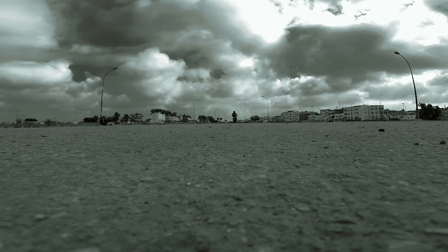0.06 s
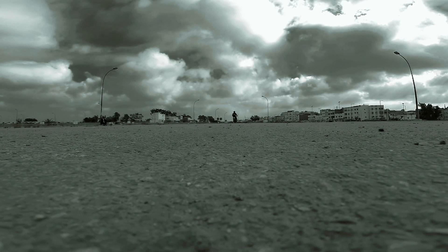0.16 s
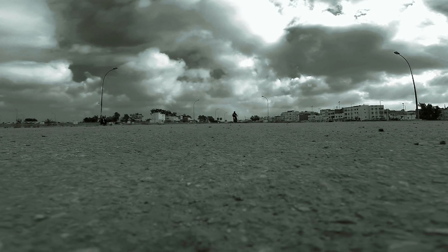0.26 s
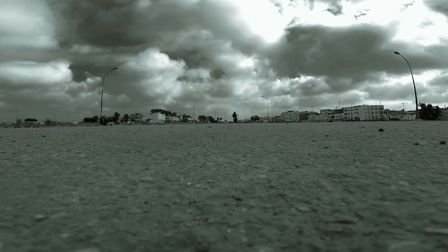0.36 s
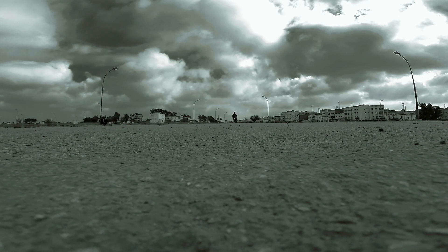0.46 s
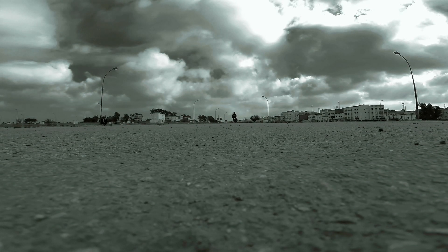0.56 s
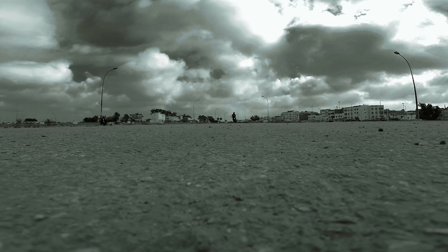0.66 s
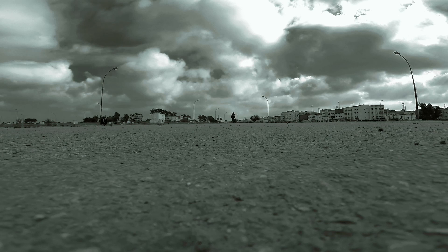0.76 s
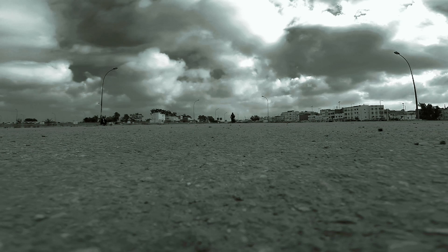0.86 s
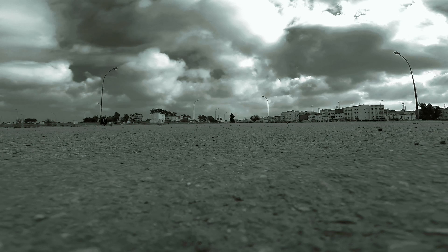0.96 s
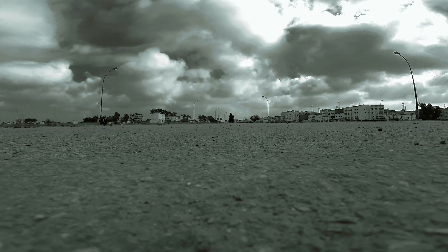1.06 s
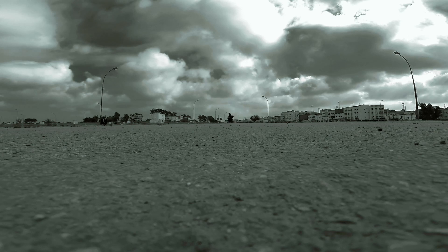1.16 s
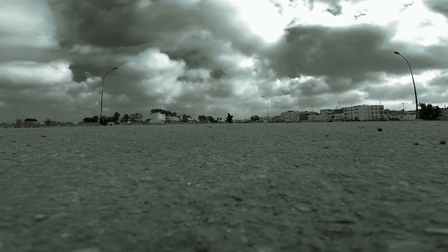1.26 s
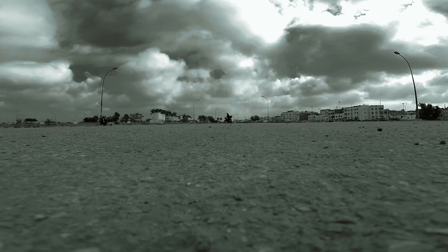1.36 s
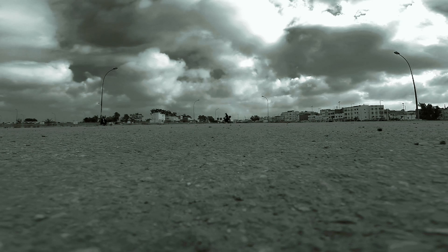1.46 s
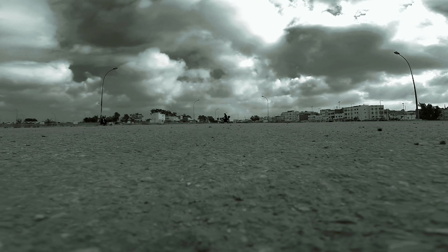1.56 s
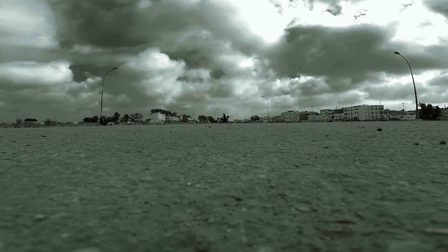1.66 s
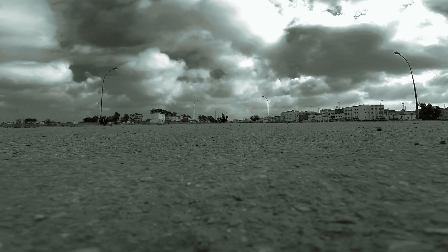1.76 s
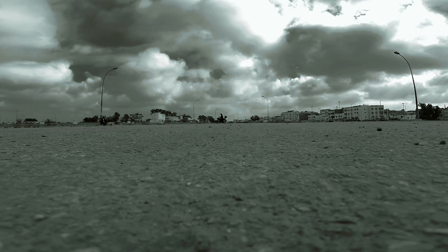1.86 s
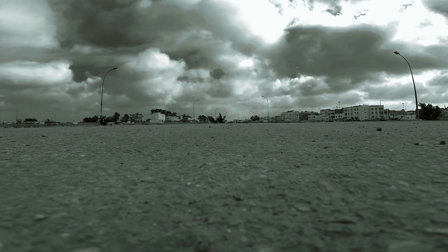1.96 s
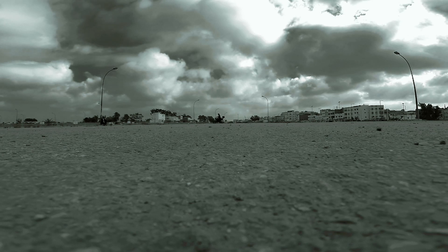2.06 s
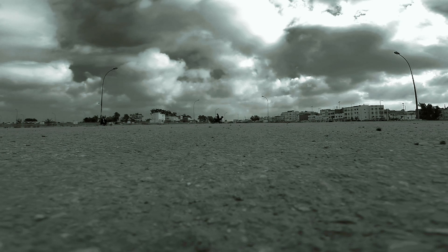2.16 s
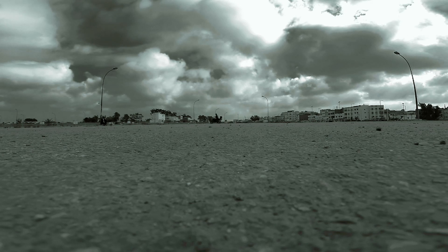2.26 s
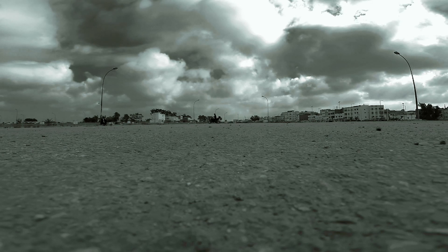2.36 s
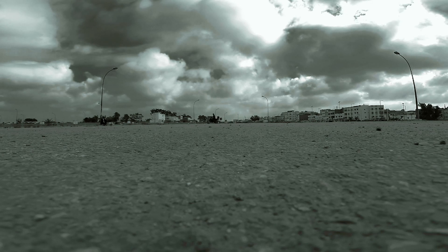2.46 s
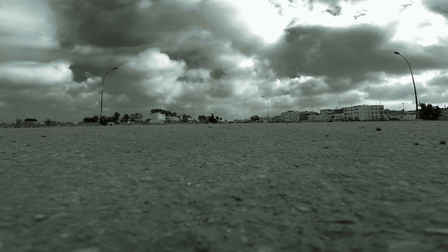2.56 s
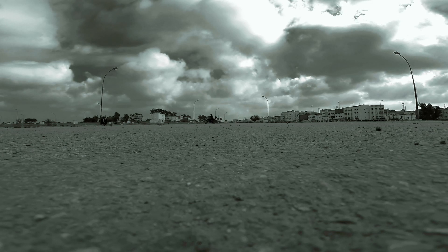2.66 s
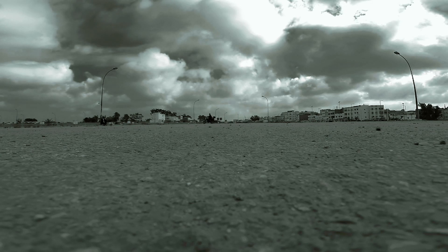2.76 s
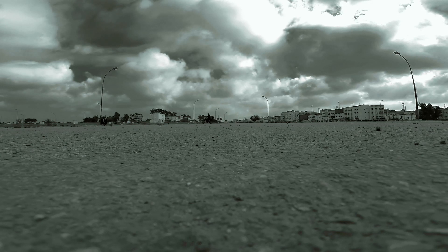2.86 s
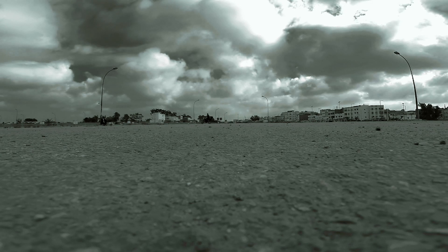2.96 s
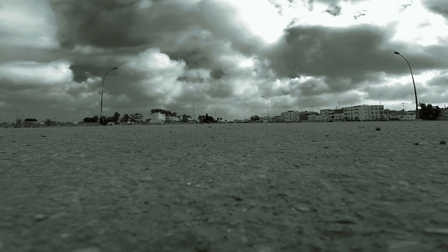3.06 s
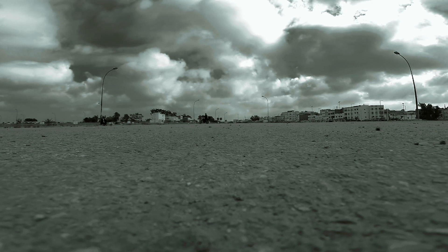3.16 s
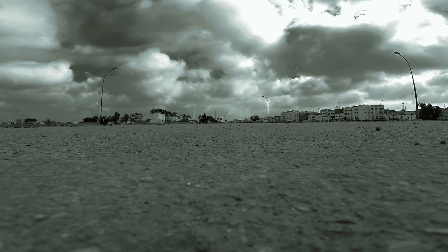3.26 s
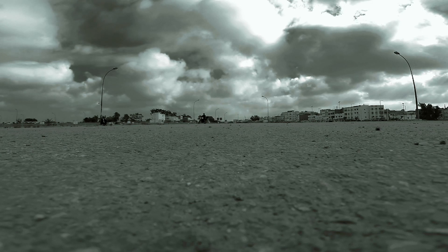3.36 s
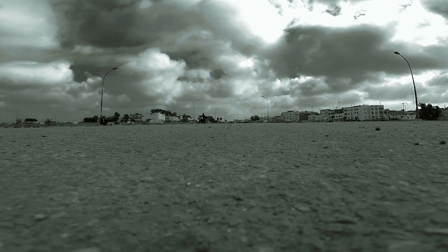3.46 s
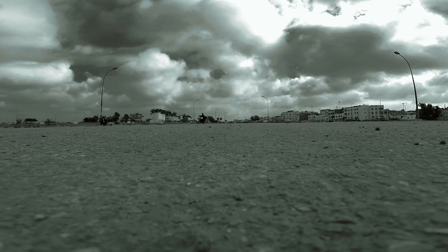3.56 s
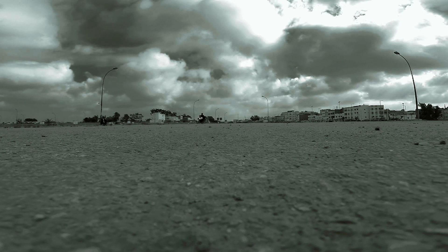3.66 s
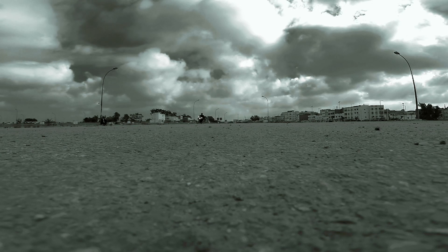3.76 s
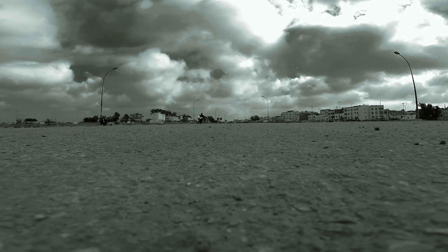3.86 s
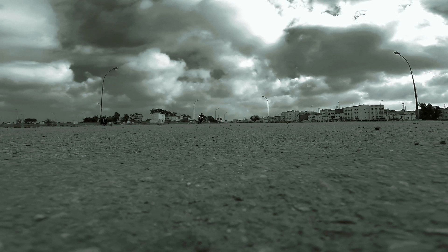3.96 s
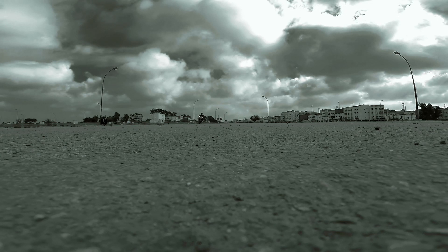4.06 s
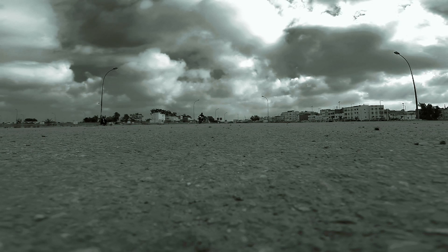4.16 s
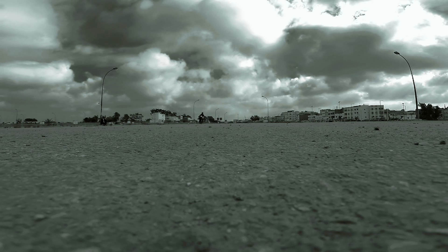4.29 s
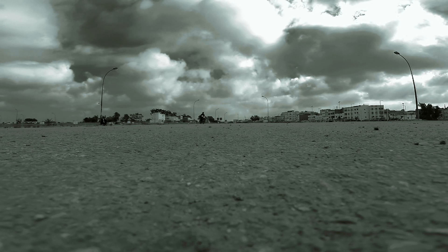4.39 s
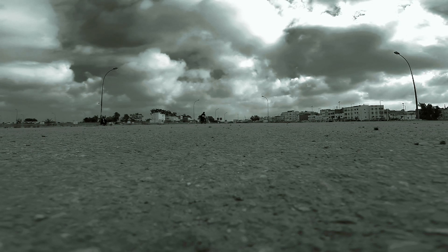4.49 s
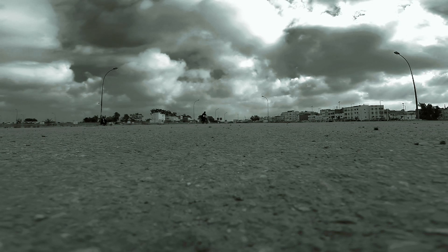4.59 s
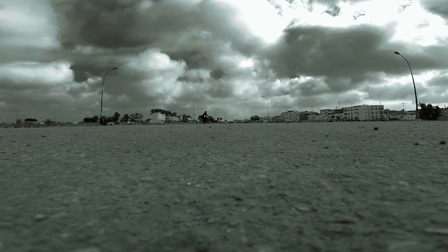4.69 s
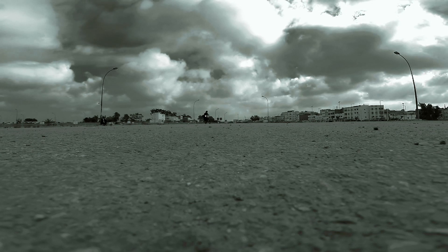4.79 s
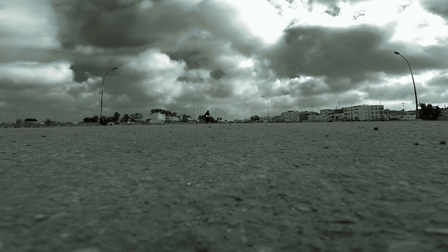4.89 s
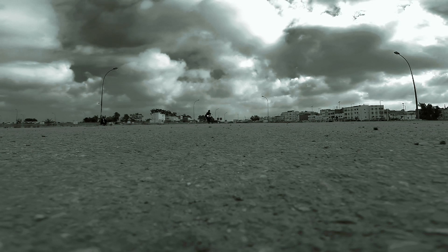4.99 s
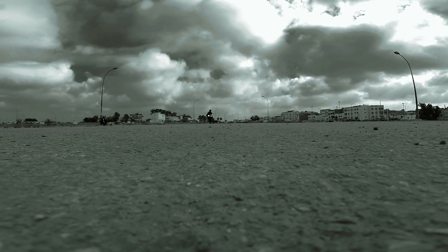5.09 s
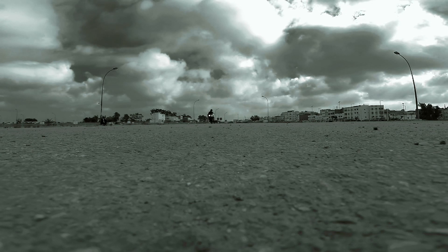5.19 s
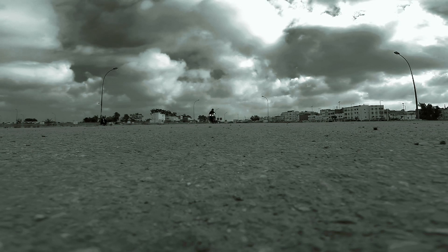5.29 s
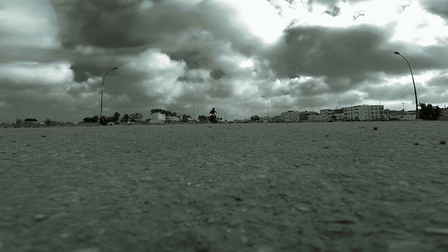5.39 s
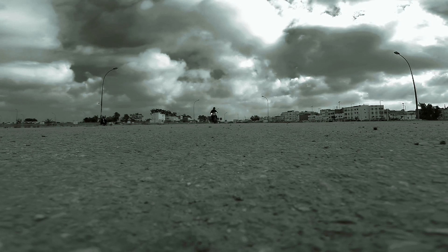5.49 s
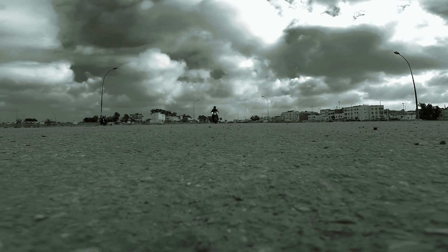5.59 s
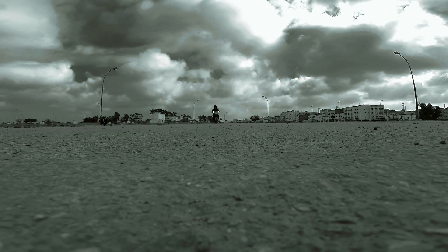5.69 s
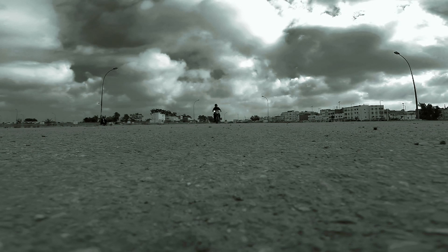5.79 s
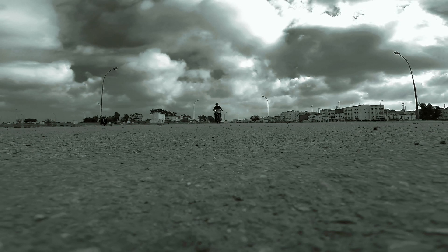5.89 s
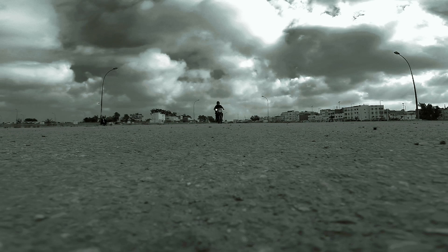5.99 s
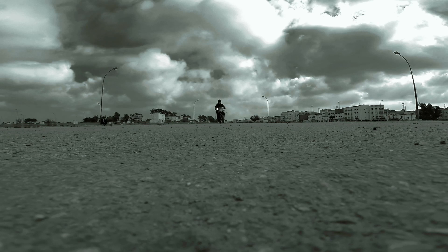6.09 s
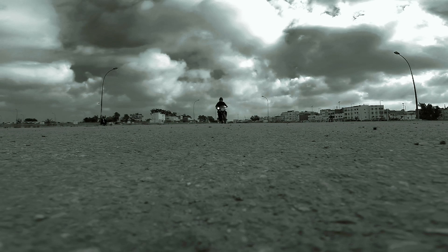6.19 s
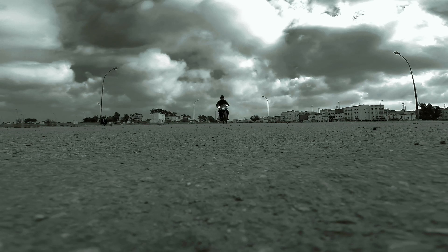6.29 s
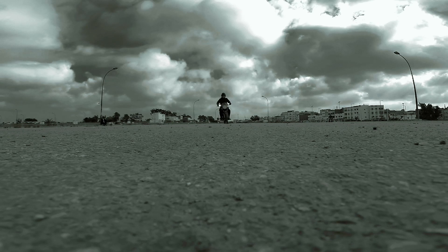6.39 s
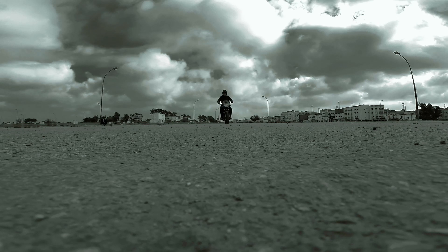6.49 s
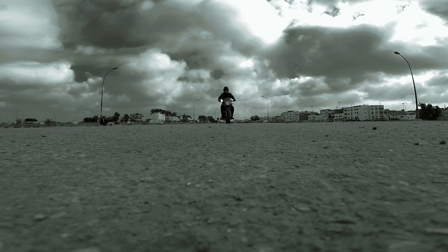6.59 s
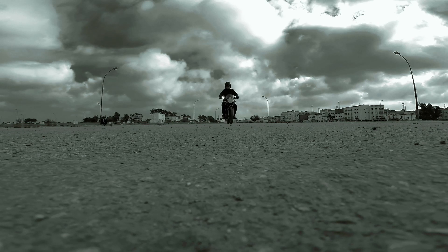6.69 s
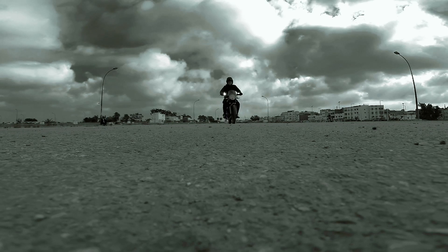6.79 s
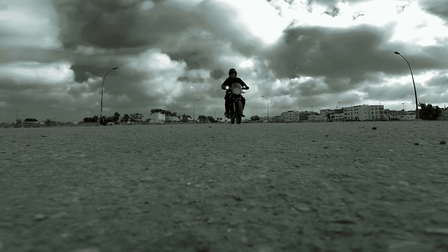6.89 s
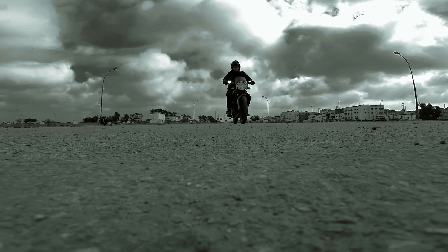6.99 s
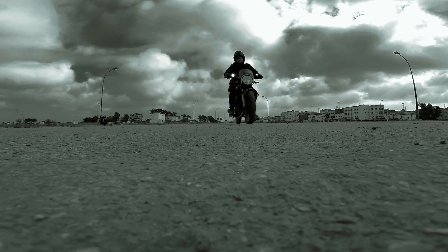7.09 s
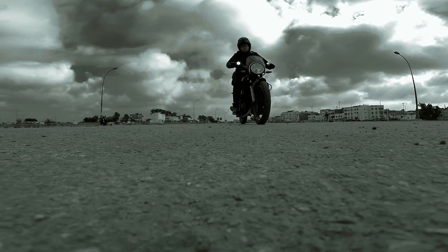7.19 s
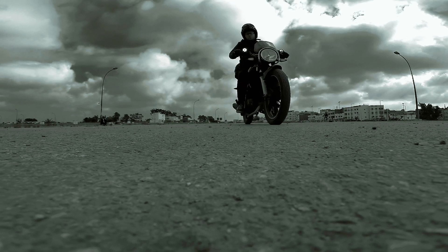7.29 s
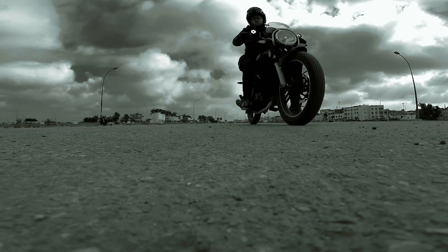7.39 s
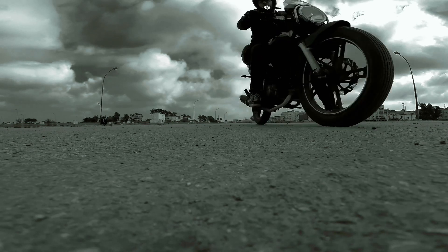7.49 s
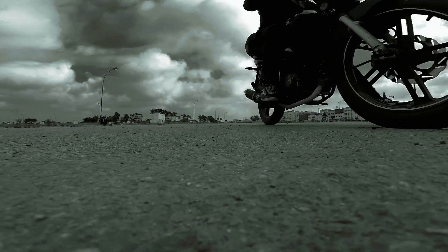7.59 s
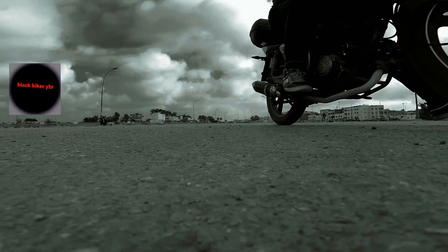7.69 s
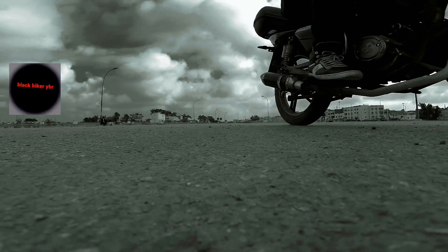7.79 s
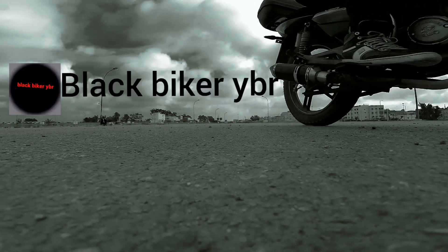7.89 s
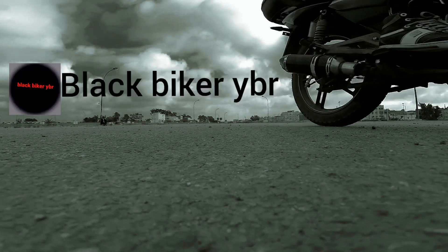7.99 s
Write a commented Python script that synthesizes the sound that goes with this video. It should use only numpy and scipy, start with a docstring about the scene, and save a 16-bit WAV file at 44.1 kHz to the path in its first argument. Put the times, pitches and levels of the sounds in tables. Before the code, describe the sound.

A motorcycle idles far off, revs in short blips, accelerates closer and brakes with a gritty tyre skid.

```python
"""A distant single-cylinder motorcycle idles unevenly on an open paved lot, over town hum and light wind.
It blips the throttle, accelerates towards a microphone on the ground, shuts off and brakes to a stop.
Each firing is a puff that rings the silencer and pipe; valves, chain and intake clatter, gears whine.
The pads make the disc squeak; slipping tyres howl, grind grit and knock stones."""
import sys
import numpy as np
from scipy import signal
from scipy.fft import rfft, irfft, next_fast_len
from scipy.io import wavfile
from scipy.ndimage import uniform_filter1d, map_coordinates

SR = 44100
rng = np.random.default_rng(int(sys.argv[2]) if len(sys.argv) > 2 else 0)


def store_wav(level_fs):
    """Save 16-bit WAV to argv[1]."""
    pcm = np.round(np.clip(np.atleast_2d(level_fs), -1, 1) * 32767)
    wavfile.write(sys.argv[1], SR, pcm.T.astype(np.int16))


N = 354984

# base firing interval: time_s, gap_ms
FIRING_GAP = [(0.01, 63.49), (1.4, 69.85), (1.466, 43.12), (3.39, 34.48), (3.46, 30.62), (3.9, 29.72),
              (4.37, 27.57), (5.1, 23.74), (5.39, 21.36), (5.7, 19.47), (6.137, 17.1), (6.175, 19.34),
              (6.6, 25.84), (6.9, 37.57), (7.29, 57.91), (7.5, 72.59), (8.05, 75.65)]


def amp(db):
    return 10 ** (np.asarray(db) / 20)


def unit(x):
    return x / np.sqrt(np.mean(x ** 2) + 1e-20)


def curves(rows, at=None):
    """Columns interpolated over the first, at every sample or at given points."""
    knots, *cols = np.transpose(rows)
    return [np.interp(np.arange(N) / SR if at is None else at, knots, c) for c in cols]


def wobble(rate_hz):
    """Smooth random curve, rate_hz knots a second."""
    knots = rng.standard_normal(int(N * rate_hz / SR) + 4)
    return map_coordinates(knots, [np.arange(N) * rate_hz / SR])


def filtered(x, response):
    """Apply a gain given as a function of Hz."""
    size = next_fast_len(N + SR // 2)
    return irfft(rfft(x, size) * response(np.fft.rfftfreq(size, 1 / SR)), size)[..., :N]


def rush(spectrum, patchy_db):
    """Coloured noise, rms 1, with time-frequency patches of random gain."""
    bins = signal.stft(rng.standard_normal(N + 512), nperseg=512)[2]
    patches = uniform_filter1d(rng.standard_normal(bins.shape), size=5, axis=0)
    patches = uniform_filter1d(patches, size=6, axis=1)
    noise = signal.istft(bins * amp(patchy_db * unit(patches)), nperseg=512)[1][:N]
    hz, db = np.transpose(spectrum)
    return unit(filtered(noise, lambda f: amp(np.interp(np.log(f + 1), np.log(hz), db, -120, -120))))


def place(times_s, rows, lead=0):
    """Sum one row at each time, starting lead samples early."""
    at = np.round(times_s * SR).astype(int)[:, None] + np.arange(rows.shape[1])
    return np.bincount(at.ravel(), rows.ravel(), N + SR)[lead:lead + N]


def firings():
    """Puff times in s: one base interval apart, with small jumps in the rhythm."""
    # next puff heard late (+) or early (-): time_s, shift_ms
    timing_skips = [(0.016, -23.9), (0.311, 20.7), (0.398, -11.8), (0.451, -9.7), (0.507, 11.9),
                    (0.584, -16.5), (0.634, 8.9), (0.844, 11.5), (1.558, 6.1), (1.607, -13.6),
                    (1.721, 19.7), (1.823, 11.8), (1.959, -10.4), (1.99, -6.8), (2.064, -3), (2.102, -5.5),
                    (2.136, -5.4), (2.17, 5.4), (2.256, 13.7), (2.349, 18.3), (2.446, 38.4), (2.637, -10.8),
                    (2.737, 18), (2.793, -18), (2.815, 10.9), (2.862, 7.6), (2.907, -6.4), (2.935, 5.2),
                    (2.977, -5.4), (3.007, 4.5), (3.049, -1.6), (3.085, 22.1), (3.179, 28.2), (3.242, 13.8),
                    (3.325, -1.8), (3.359, 5), (3.399, -7.1), (3.427, 4.5), (3.493, -4.9), (3.519, 3.6),
                    (3.554, 5.3), (3.619, 2.8), (3.653, -6.7), (3.977, -11.0), (4.024, 5.0), (4.117, -11.3),
                    (4.305, -11.4), (4.537, -6.6), (4.585, -6.3), (4.631, -6.3), (4.677, -6.7),
                    (4.748, -6.1), (4.819, -9.6), (4.909, -5.0), (5.003, -5.5), (5.07, 9.4), (6.385, 6.8),
                    (6.51, -2.8), (6.582, -3.7), (6.652, -9.4), (6.763, -4.8), (6.789, -6.0), (6.816, 10.5),
                    (6.86, -11.3), (6.92, -5.5), (6.953, 13.2), (7.006, -7.8), (7.086, 13.4),
                    (7.148, -12.5), (7.351, -19.9), (7.454, -13.2)]
    skip_s, shift_ms = np.transpose(timing_skips)
    fire_s = [FIRING_GAP[0][0]]
    while fire_s[-1] < N / SR:
        now = fire_s[-1]
        late_ms = shift_ms[(skip_s > now) & (skip_s <= now + .012)].sum()
        fire_s.append(now + (curves(FIRING_GAP, now)[0] + late_ms) / 1000)
    return np.array(fire_s)


def throttle(fire_s):
    """Per firing: blips lift level and pitch; snapping shut boosts the second chamber."""
    # throttle openings: start_s, held_s, boost_db, chamber_snap_db
    openings = [(1.455, .07, 12, 5), (1.9, .1, 13, 10), (2.84, .075, 13, 9.5), (3.34, .09, 12, 11),
                (3.66, .085, 8, 11.5), (3.87, 2.285, 0, 8)]
    # single weak or strong firings: time_s, gain_db
    uneven = [(.11, 3), (.245, -4.5), (.305, 3), (.392, -2.5), (1.4, 3), (1.601, -6.5), (1.912, -2.5),
              (2.131, 3.5), (2.211, -0.5), (2.25, 4), (2.788, 1), (2.809, 11), (3.043, 4.5), (3.173, 5.5),
              (3.236, -0.5), (3.285, -11), (3.32, 8), (3.457, -4.5), (3.651, -8), (3.791, -4.5),
              (3.85, -11.5), (4.126, -2.5), (4.311, -3), (6.524, -2), (6.854, -10.5), (7.001, -2.5),
              (7.037, 5)]
    settle_s, sink_s, shut_fade_s = .18, .08, .6
    start_s, held_s, boost_db, chamber_snap_db = np.transpose(openings)
    after_s = fire_s[:, None] - start_s - held_s
    opened = (after_s > -held_s) & (after_s < 0)
    tail = lambda decay_s: (after_s > 0) * np.exp(-np.abs(after_s) / decay_s)
    uneven_db = sum(db * (np.abs(fire_s - s) < .008) for s, db in uneven)
    extra_db = (opened + tail(settle_s)) @ boost_db + uneven_db
    weak_db = 1.2 * np.minimum(uneven_db, 0)  # weak firings lose front and pipe ring
    blipped = opened @ boost_db > 0
    climb = opened * (1 + after_s / held_s) + tail(sink_s)
    pitch_ratio = 1 + .014 * (climb @ boost_db)
    snap_db = np.exp(-((after_s - .03) / .026) ** 2) @ chamber_snap_db
    shut = tail(shut_fade_s).max(axis=1) * ~opened.any(axis=1)  # 1 on closing, then fades
    return np.array([extra_db, weak_db, blipped, pitch_ratio, snap_db, shut])[..., None]


def silencer(t, hz, steepness, front_db, chamber_db, t60_s, hold):
    """Thud: a steepened suction front, then the main note and a second chamber ring out."""
    chamber_hz = 179
    cycles = hz * t * np.where(t < 0, steepness, 1)
    rise = np.sin(np.pi * np.clip(2 * cycles + 1.5, 0, .5)) ** 2
    front = amp(front_db * np.clip(-2 * cycles, 0, 1))
    fade = amp(-60 * (np.maximum(t, 0) / t60_s) ** hold)
    chamber = amp(chamber_db) * np.cos(2 * np.pi * chamber_hz * t)
    return rise * front * fade * (np.cos(2 * np.pi * cycles) + chamber)


def pipe(t, stage, tuning, shut, scatter):
    """Pipe modes jump in pitch on shut-off; the upper three swell slower, ring louder and longer."""
    # pipe resonances: base_hz, level_db, base_t60_s, full_load_gain_db
    modes = [(334, 24, 0.0097, -5.5), (463.7, -6, 0.077, -8), (616, -10.5, 0.063, 9.5),
             (856, -3.5, 0.027, 6)]
    load = np.clip(stage / 3 - 1, 0, 1)
    pitch_ratio = tuning + .21 * shut
    ring = 0
    for k, (base_hz, level_db, base_t60_s, load_db) in enumerate(modes):
        ringing = (k > 0) * shut ** .35
        mode_db = level_db + load_db * load + 12 * ringing + (1.5 + k / 2) * scatter[k]
        t60_s = base_t60_s * (1 + .8 * ringing)
        attack = 1 - np.exp(-t / (.00006 + .005 * ringing))
        ring += attack * amp(mode_db - 60 * t / t60_s) * np.sin(2 * np.pi * base_hz * pitch_ratio * t)
    return ring


def pipe_mouth(hz):
    """Response: the small mouth radiates little deep bass, and the pipe holds back one band."""
    notch_hz, width_hz, depth = 773, 167, .51
    low_cut = 1 / (1 + (55 / (hz + 1)) ** 4)
    damping = 1j * hz * width_hz
    return low_cut * (1 - depth * damping / (notch_hz ** 2 - hz ** 2 + damping))


def exhaust(fire_s):
    """One puff of silencer thud and pipe ring per firing; louder when near, brighter under load."""
    # approach: time_s, base_level_db, stage
    ride = [(0, -27.5, 0.66), (1.35, -27.5, -0.5), (1.45, -30.5, 1.5), (1.85, -29.5, 2), (2.75, -31, 1),
            (3.3, -32, 1.5), (3.5, -26, 1.9), (3.62, -25, 2.5), (3.85, -25, 4), (3.9, -18.5, 3.5),
            (4.3, -15.5, 6), (5, -12.5, 5.5), (5.5, -13, 7), (6.1, -10.5, 7.5), (6.158, -14.5, 5),
            (6.17, -10.5, 4.5), (6.3, -12, 4), (6.5, -11, 3), (6.8, -11, 2.12), (6.96, -10, 1.5),
            (7.08, -21, 2.5), (7.25, -19.5, 3.5), (7.5, -14, 0), (8.05, -13.5, 0.43)]
    # stages: 0 idle, 1 coast, 2 engine braking, 3 just shut at speed, 4 pull away, 5 hard pull, 6 full
    # base puff shape: stage, silencer_hz, t60_s, hold_exponent, steepness, front_db, chamber_db,
    # cutoff_hz, pipe_db
    puff_shapes = [(0, 125, 0.048, 3.7, 1.1, -17, -10.5, 447, -26),
                   (1, 115.7, 0.042, 1.8, 1.25, -3, -11.5, 450, -24.5),
                   (2, 118.4, 0.05, 1.18, 1.196, 0, -19.5, 610, -19.5),
                   (3, 146, 0.061, 1.4, 1.7, 1.5, -2.5, 645, -9.5),
                   (4, 140.6, 0.08, 1.74, 1.9, 3.5, -4.5, 865, -14),
                   (5, 125.6, 0.062, 1.02, 2.46, -3.5, 11, 1220, -15.5),
                   (6, 120.6, 0.025, 1.84, 2.16, 5, -8, 1480, -8)]
    # puff shape in a blip: same columns without stage
    blip_shape = (126, .03, 3.2, 2.1, -1.5, -10, 580, -14.5)
    # modes rise under load, top opens on approach: time_s, pitch_ratio, cutoff_ratio
    pipe_tuning = [(0, .86, 1), (3.9, .85, .78), (4.3, .88, .68), (4.8, .92, .84), (5.7, 0.99, 1),
                   (6.15, 1.03, 1), (6.17, .9, 1), (6.6, .89, .9), (7, .86, .8), (8.05, .84, 1)]
    # brief stutters in the sound, a puff heard twice in quick succession: time_s, gain_db
    stutters = [(6.4013, -4.5), (6.845, -5.5), (7.089, -6), (7.129, -3)]
    stutter_s, stutter_db = np.transpose(stutters)
    fire_s = np.append(fire_s, stutter_s)
    lead = SR // 100
    t = (np.arange(SR // 10) - lead) / SR
    level_db, stage = curves(ride, fire_s[:, None])
    tuning, cutoff_ratio = curves(pipe_tuning, fire_s[:, None])
    extra_db, weak_db, blipped, pitch_ratio, snap_db, shut = throttle(fire_s)
    extra_db[-len(stutters):, 0] += stutter_db
    shape = [np.where(blipped, blip, usual) for usual, blip in zip(curves(puff_shapes, stage), blip_shape)]
    base_hz, t60_s, hold, steepness, front_db, chamber_db, cutoff_hz, pipe_db = shape
    scatter = rng.standard_normal((len(fire_s), 8)).T[..., None]
    pitch_scatter, level_scatter, chamber_scatter, *mode_scatter, cutoff_scatter = scatter

    hz = base_hz * pitch_ratio * (1 + .008 * pitch_scatter)
    chamber_db = chamber_db + snap_db + .5 * chamber_scatter
    thud = silencer(t, hz, steepness, front_db + weak_db, chamber_db, t60_s, hold)
    since_front_s = np.maximum(t + .5 / (hz * steepness), 0)
    ring = pipe(since_front_s, stage, tuning, shut, mode_scatter)

    gap_samples = curves(FIRING_GAP, fire_s[:, None])[0] * SR / 1000
    fill_gap = lambda rows: rows * np.sqrt(gap_samples / np.sum(rows ** 2, axis=1, keepdims=True))
    puffs = fill_gap(thud) + amp(pipe_db + weak_db) * fill_gap(ring)
    puffs *= amp(level_db + extra_db + .5 * level_scatter)
    cutoff_hz = cutoff_hz * cutoff_ratio * np.exp(.1 * cutoff_scatter)
    lowpass = 1 / (1 + (np.fft.rfftfreq(len(t), 1 / SR) / cutoff_hz) ** 4)
    puffs = irfft(rfft(puffs) * lowpass, len(t))
    return filtered(place(fire_s, puffs, lead), pipe_mouth)


def lot_echo(x, t60_s=.35):
    """Scattered echoes from kerbs and far buildings."""
    t = np.arange(SR // 3) / SR
    tail = rng.standard_normal(len(t)) * amp(-60 * t / t60_s) * (t > .012)
    return signal.fftconvolve(x, tail / np.linalg.norm(tail))[:N]


def town():
    """Even town noise with narrow bands that waver independently."""
    # background levels: time_s, noise_db, hum_db
    levels = [(0, -43.5, -59.5), (3.25, -43, -60), (3.4, -43, -68), (4.3, -40, -79.5), (6.5, -36.5, -77),
              (8.05, -36, -78)]
    # broad noise: freq_hz, density_db
    spectrum = [(130, -3.5), (250, 0.5), (500, -9), (1000, -13), (2000, -21.5), (3200, -24.5),
                (5000, -35.5), (8000, -44), (14000, -54)]
    # hum bands: centre_hz, width_hz, relative_db
    bands = [(2620, 200, 0), (3780, 60, -1), (4120, 45, -11), (4480, 45, -11), (5050, 55, -10),
             (5260, 50, -14), (6140, 45, -19)]
    noise_db, hum_db = curves(levels)
    hum = 0
    for centre_hz, width_hz, db in bands:
        resonance = lambda hz: 1 / np.abs(1 + 2j * (hz - centre_hz) / width_hz) ** 2
        hum += amp(db + 1.6 * wobble(3.1)) * filtered(rng.standard_normal(N), resonance)
    return amp(noise_db + .5 * wobble(2.5)) * rush(spectrum, patchy_db=.7) + amp(hum_db) * unit(hum)


def wind():
    """Gusty rumble on the microphone."""
    # wind strength: time_s, level_db
    levels = [(0, -32), (.7, -39), (1.3, -31.5), (2, -36), (2.7, -32), (3.3, -35), (3.8, -31), (5, -32),
              (5.8, -31), (6.8, -37), (8, -38)]
    # rumble: freq_hz, density_db
    spectrum = [(15, -19), (30, -12), (50, -10), (80, -10), (130, -17), (200, -32)]
    return amp(curves(levels)[0]) * unit(amp(2.2 * wobble(6)) * rush(spectrum, patchy_db=2))


def clatter(fire_s):
    """Valves, chain and intake: a noise burst after each firing, over a steady floor."""
    # clatter levels: time_s, rattle_db, sizzle_db
    levels = [(3.6, -68, -77.5), (4.61, -45, -81), (5.12, -39.5, -58.5), (5.32, -46, -64.5),
              (6.03, -42, -59), (6.85, -52.5, -59.5), (7.18, -40.5, -48)]
    # clatter between firings: time_s, floor_gain
    floor = [(3.6, .15), (4.7, .15), (5.1, .25), (5.8, .5), (7.2, .6)]
    # metal rattle: freq_hz, density_db
    rattle_spectrum = [(680, -25), (1150, -10.5), (1630, -7), (1940, -7.5), (2430, -11.5), (3970, -17.5),
                       (6500, -31.5), (8450, -52.5), (14300, -120)]
    # high sizzle: freq_hz, density_db
    sizzle_spectrum = [(5000, -3), (6500, -7.5), (9000, -14.5), (12000, -27.5), (15000, -31)]
    lag_s, half_width_s, lead = .0012, .0032, SR // 100
    t = (np.arange(SR // 20) - lead) / SR
    bursts = amp(1.6 * rng.standard_normal((len(fire_s), 1))) * np.exp(-((t - lag_s) / half_width_s) ** 2)
    bursts = 1.5 * signal.lfilter([.006], [1, -.994], bursts)  # each trails off
    beats = curves(floor)[0] + place(fire_s, bursts, lead)
    rattle_db, sizzle_db = curves(levels)
    rattle = amp(rattle_db + .75 * wobble(3.6)) * unit(beats * rush(rattle_spectrum, patchy_db=1.05))
    sizzle = amp(sizzle_db + 1.3 * wobble(10)) * unit(beats * rush(sizzle_spectrum, patchy_db=-3.5))
    return rattle + sizzle


def gear_whine(teeth_per_firing=36):
    """Teeth mesh at a multiple of the firing rate."""
    # whine: time_s, level_db
    levels = [(4.9, -90), (5.3, -58), (5.6, -49), (6.08, -41.5), (6.13, -34), (6.16, -86)]
    mesh_hz = teeth_per_firing * 1000 / uniform_filter1d(curves(FIRING_GAP)[0], size=SR // 50)
    phase = 2 * np.pi * np.cumsum(mesh_hz) / SR
    return amp(curves(levels)[0] + .57 * wobble(23)) * np.sin(phase + .72 * wobble(60))


def thin_tones():
    """Faint wavering tones as the machine slows."""
    # tones: start_s, end_s, pitch_hz, relative_db
    tones = [(6.04, 6.14, 4290, -61), (6.27, 6.49, 4290, -63.5), (6.719, 7.1, 3710, -67)]
    t = np.arange(N) / SR
    sound = 0
    for start_s, end_s, hz, db in tones:
        gate = np.clip(np.minimum(t - start_s, end_s - t) / .04, 0, 1)
        sound += amp(db + 8 + 2.5 * wobble(19)) * gate * np.sin(2 * np.pi * hz * t + 1.6 * wobble(30))
    return sound


def brake_squeaks():
    """Short rough squeaks: the pads excite a high disc mode and its close neighbour."""
    # disc squeaks: start_s, relative_db, pitch_hz
    squeaks = [(6.797, -42, 13400), (6.808, -36, 13400), (6.822, -33, 13000), (6.86, -33, 13400),
               (6.873, -29, 13200), (6.929, -39, 13400), (6.939, -37, 13400), (7.069, -48, 13500),
               (7.251, -43, 13600), (7.32, -43, 13400), (7.347, -33, 13500), (7.449, -48, 13500),
               (7.554, -49, 13600), (7.642, -45, 13300), (7.668, -40, 12900), (7.681, -37, 13500),
               (7.785, -42, 13600), (7.835, -22, 12900), (7.855, -21, 13500), (7.896, -30, 13600)]
    start_s, db, hz = np.transpose(squeaks)[..., None]
    t = np.arange(SR // 25) / SR
    slip_rad = 5.4 * uniform_filter1d(rng.standard_normal((len(squeaks), len(t))), size=140, axis=1)
    ring = np.sin(2 * np.pi * hz * t + slip_rad) + .3 * np.sin(2 * np.pi * (hz + 260) * t)
    return place(start_s[:, 0], amp(db - 3) * np.exp(-((t - .006) / .0049) ** 2) * ring)


def tyre_scrub():
    """Braked rubber slips in uneven grains, shakes the carcass, grinds and cracks grit."""
    # scrub levels: time_s, howl_db, scrape_relative_db
    levels = [(7.08, -56, 2.5), (7.15, -45.5, -2), (7.19, -32, 1.5), (7.3, -20.5, -3), (7.38, -19.5, -1),
              (7.46, -20.5, 0.5), (7.5, -22, -1.5), (7.57, -24.5, 0.5), (7.7, -23, -3.5), (7.78, -25, -2.5),
              (7.82, -24, 1.5), (7.86, -23.5, 0.5), (7.9, -23, -3), (7.96, -28, -3), (8, -29, 2),
              (8.05, -36, 5.5)]
    # tread howl: freq_hz, density_db
    howl_spectrum = [(1150, -41), (1450, -1), (1700, 7.5), (1900, 0), (2200, -8.5), (2700, -34),
                     (3400, -59)]
    # rubber scrape: freq_hz, density_db
    scrape_spectrum = [(750, -11.5), (950, -11), (1200, -5), (1350, -3.5), (1550, -3.5), (1900, -64)]
    # modulation of the carcass note: freq_hz, density_db
    shake_spectrum = [(2, 3), (60, 0.5), (130, -7), (300, -21)]
    # grit: freq_hz, density_db
    grit_spectrum = [(1350, -33), (2300, -6), (3100, -9), (5900, -12), (12200, -35), (13700, -34.5),
                     (15000, -43)]
    # grit cracking: start_s, level_db
    cracks = [(7.287, -29), (7.333, -31), (7.419, -29), (7.5, -31), (7.687, -31), (7.727, -34)]
    howl_db, scrape_db = curves(levels)
    braking_s = np.maximum(np.arange(N) / SR - levels[0][0], 0)
    grip = amp(.76 * wobble(130) + .77 * wobble(35))
    howl = unit(grip * rush(howl_spectrum, patchy_db=1.2))
    scrape = amp(scrape_db) * unit(grip * rush(scrape_spectrum, patchy_db=1.5))
    # the carcass note falls and gains on the howl as the wheel slows
    carcass_hz, carcass_db = 703 - 205 * braking_s, -8 + 6 * braking_s
    note = np.sin(2 * np.pi * np.cumsum(carcass_hz) / SR)
    carcass = amp(carcass_db) * unit(note * rush(shake_spectrum, patchy_db=-1.5))
    grains = grip * amp(1.25 * wobble(300) + 1.46 * wobble(12))
    grit = amp(-8.5) * unit(grains * rush(grit_spectrum, patchy_db=2.5))
    scrub = amp(howl_db) * (howl + scrape + carcass + grit) * (braking_s > 0)
    crack_s, crack_db = np.transpose(cracks)
    t = np.arange(SR // 30) / SR
    bursts = place(crack_s, amp(crack_db[:, None]) * np.exp(-((t - .004) / .0029) ** 2))
    return scrub + bursts * rush(grit_spectrum, patchy_db=-9)


def stone_knocks(ring_hz=1250, t60_s=.013, attack_s=.00024):
    """Stones knocked by the tyre: a brief ring with dull noise."""
    # knocks: start_s, level_db
    knocks = [(7.79, -2), (7.826, 0)]
    start_s, db = np.transpose(knocks)
    t = np.arange(SR // 30) / SR
    noise = uniform_filter1d(rng.standard_normal((len(knocks), len(t))), size=14, axis=1)
    envelope = amp(db[:, None] - 60 * t / t60_s) * (1 - np.exp(-t / attack_s))
    return place(start_s, envelope * (np.sin(2 * np.pi * ring_hz * t) + .6 * noise))


def scene():
    """Mono mix; only the exhaust echoes."""
    fire_s = firings()
    puffs = exhaust(fire_s)
    echo = amp(-21) * lot_echo(puffs)
    machine = clatter(fire_s) + gear_whine() + thin_tones()
    stopping = tyre_scrub() + stone_knocks() + brake_squeaks()
    return (puffs + echo + machine + stopping + town() + wind())[None]


def record(dry):
    """Microphone: bass roll-off, soft peak limiting, band limit."""
    low_cut_hz, ceiling, top_hz = 22, .85, 15272
    x = filtered(dry, lambda hz: 1j * hz / (low_cut_hz + 1j * hz))
    x = x / (1 + np.abs(x / ceiling) ** 4) ** .25
    return filtered(x, lambda hz: hz < top_hz)


dry = scene()
out = record(dry)
store_wav(out)
```